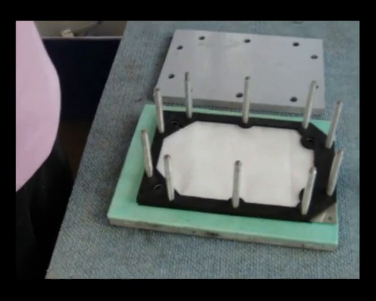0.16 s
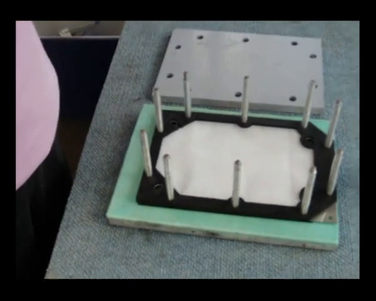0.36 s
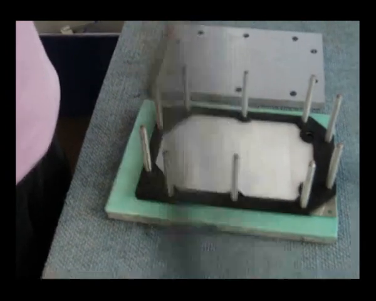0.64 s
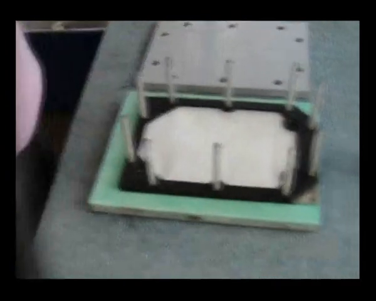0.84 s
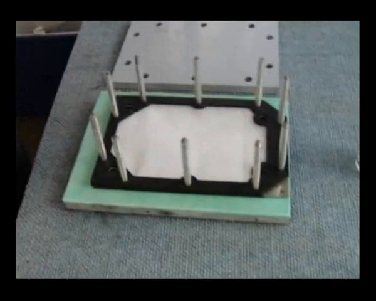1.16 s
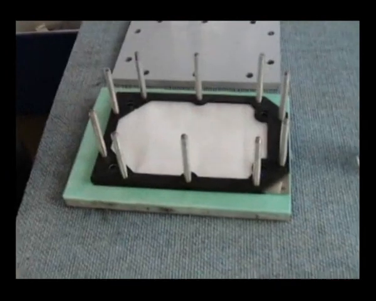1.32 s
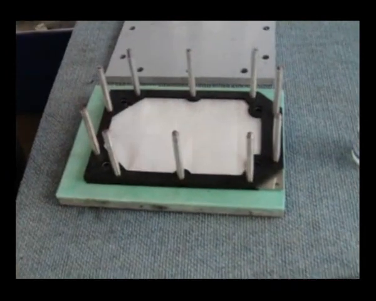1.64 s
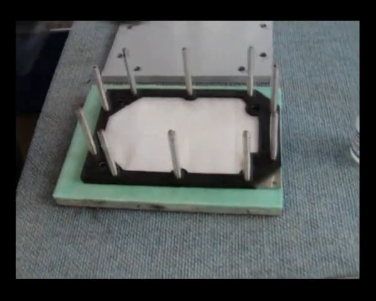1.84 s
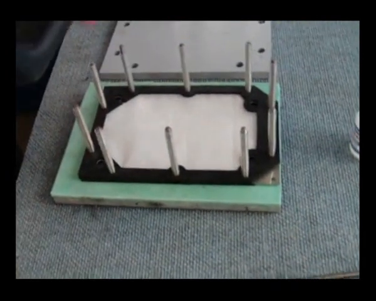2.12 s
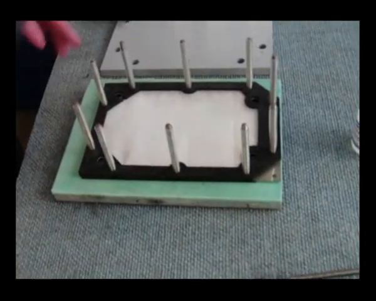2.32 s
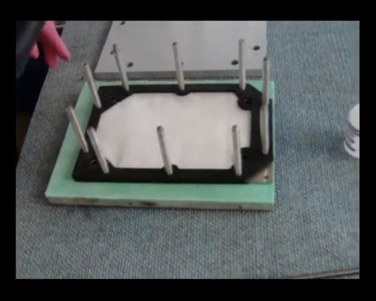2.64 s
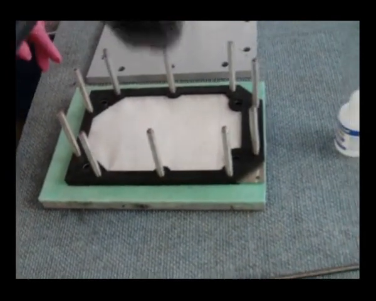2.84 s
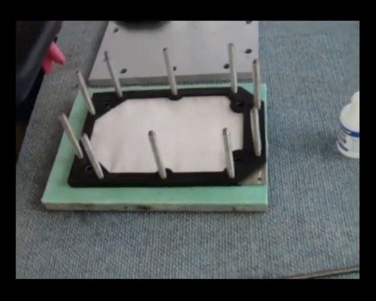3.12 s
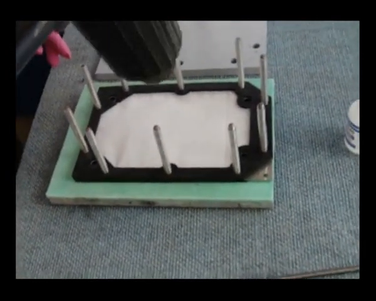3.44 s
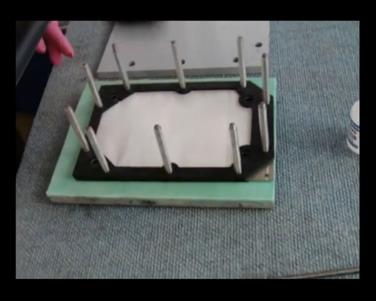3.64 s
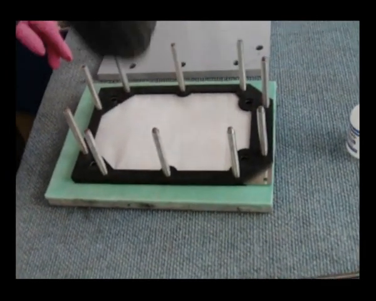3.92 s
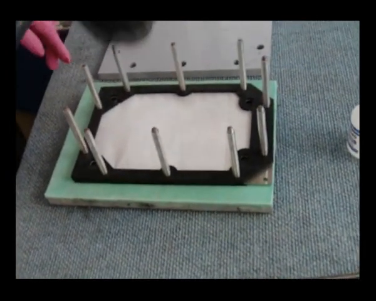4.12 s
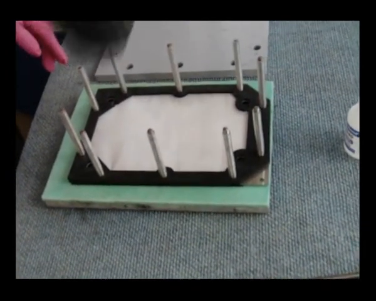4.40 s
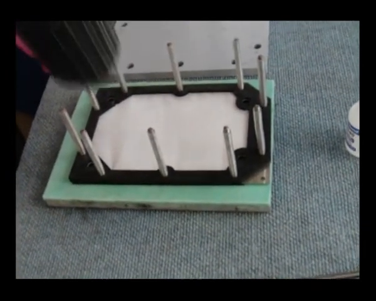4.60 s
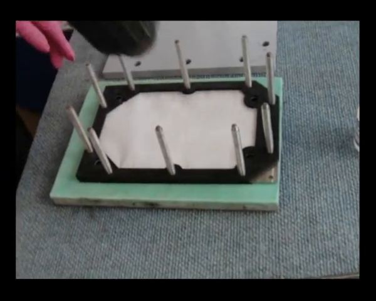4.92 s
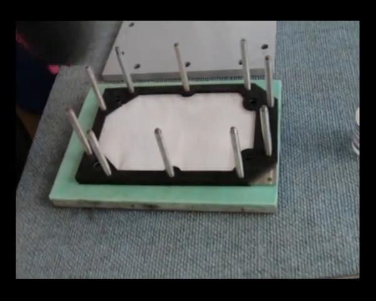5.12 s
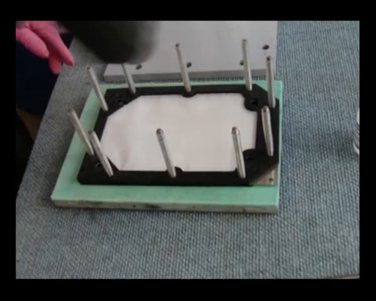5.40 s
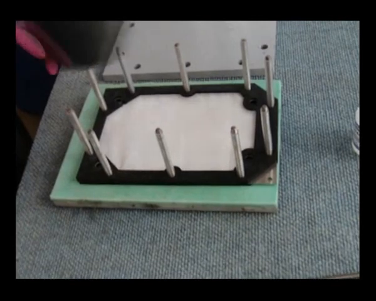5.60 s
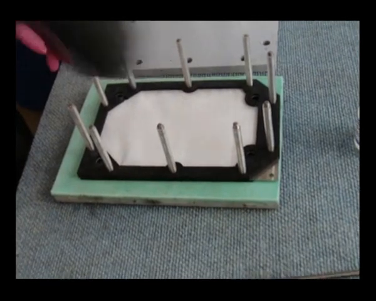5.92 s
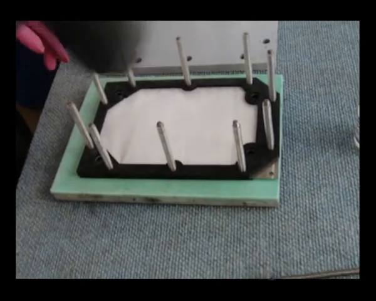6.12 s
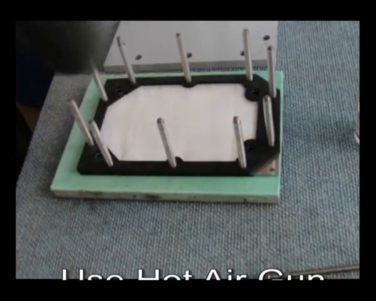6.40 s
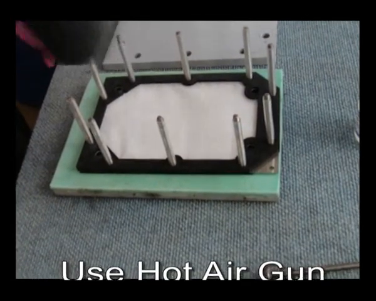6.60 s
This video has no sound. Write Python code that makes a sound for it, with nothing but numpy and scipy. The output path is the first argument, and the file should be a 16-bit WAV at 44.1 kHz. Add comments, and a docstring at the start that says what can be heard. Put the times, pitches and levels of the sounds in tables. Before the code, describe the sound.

A hot air gun spins up and runs steadily, a close rush of air with a wavering fan whine.

```python
"""A hot air gun spins up close to a mono microphone: the fan's hum and blade whine glide up in pitch
over a steady rush of air from the barrel, and mains ripple gives the whine a slight throb.
From half a second on, the nozzle moves in over a workpiece on a cloth-covered table; the rush brightens.
For the rest of the scene the gun is waved over the work: the pitch drifts a little,
and single tones at multiples of the shaft rate swell and fade as the reflections shift."""
import sys
import numpy as np
from scipy import signal
from scipy.fft import rfft, irfft
from scipy.io import wavfile

SR = 44100
rng = np.random.default_rng(int(sys.argv[2]) if len(sys.argv) > 2 else 0)


def generate_wav(signal):
    """Clip the signal to [-1, 1] and save it as 16-bit WAV at the path in sys.argv[1]."""
    frames = np.transpose(np.atleast_2d(signal))
    scaled = np.clip(frames, -1, 1) * 32767
    pcm = np.round(scaled).astype(np.int16)
    wavfile.write(sys.argv[1], SR, pcm)


N = 297675
T = np.arange(N) / SR
FREQS = np.arange(N // 2 + 1) * SR / N
START_HZ, RUNNING_HZ, SPIN_UP_S = 275.3, 349.5, 0.308
RIPPLE_HZ, TOP_HZ = 100, 11900
ORDER_PHASE = rng.uniform(0, 2 * np.pi, size=64)  # start phase of each multiple of the shaft rate

# pitch drift of the motor as the gun is waved: (time [s], shaft rate offset [Hz])
PITCH_DRIFT = [(.25, -1), (.6, 0), (1.15, 1), (1.5, -0.69), (2.72, 0.7), (2.95, 3.5), (3.52, 5.5),
               (3.78, 2.5), (4.35, 0.6), (4.6, 3), (4.95, 4.7), (5.1, 4), (5.38, 5), (5.6, 3.5), (6.5, 2)]
# the nozzle's move: (time [s], nearness [0 = held away, 1 = over the work])
NOZZLE_MOVE = [(.5, 0.046), (1.2, 0.33), (1.7, 0.66), (2.4, 1), (3.4, 0.8), (6.0, 1)]
# envelope of the hum's fundamental: (time [s], level [dB])
HUM_ENVELOPE = [(.2, -39), (.31, -32), (.41, -42.5), (.72, -33), (1.0, -32.5), (1.35, -30.5), (2.7, -28.5),
                (3.5, -30), (4.1, -28.5), (5.1, -30.5), (5.32, -33), (5.55, -30.5), (6.1, -29.5),
                (6.75, -29.5)]
# body of the hum: (shaft order, level held away [dB], level over the work [dB], speed exponent)
HUM_PARTIALS = [(4, -35.5, -37, -1), (5, -34.5, -45, -1.1), (6, -39, -35, 1)]
# whine of the blades: (shaft order, level held away [dB], level over the work [dB], speed exponent)
WHINE_PARTIALS = [(7, -30.5, -32.5, 11), (8, -21.5, -29.5, 3.2), (9, -32, -29, 13)]
# thin sheen of fan and motor tones: (shaft order, relative level [dB])
SHEEN_PARTIALS = [(2, -39.5), (3, -37.5), (10, -39), (11, -39), (13, -42), (14, -38.5), (15, -47.5),
                  (16, -47.5), (19, -45), (20, -45), (21, -48), (22, -47), (23, -45), (24, -44),
                  (25, -40.5), (26, -41.5), (27, -39.5), (28, -42), (29, -42), (30, -40), (31, -38),
                  (32, -44), (33, -45)]
# single tones that swell as the motor speeds up or the gun turns:
# (time [s], shaft order, half length [s], peak level [dB])
TONE_SWELLS = [(0, 5, .15, -28), (.05, 8, .08, -33), (.054, 39, .08, -32.5), (0.158, 15, .18, -31),
               (0.222, 36, .07, -31), (.23, 8, .1, -23), (.24, 35, .08, -30), (.25, 4, .25, -29.5),
               (0.325, 25, .07, -35), (.42, 33, .15, -41), (.42, 34, 0.13, -33), (0.453, 5, .1, -27.5),
               (.47, 29, .14, -41), (0.818, 8, 0.16, -22.5), (1.1, 7, 0.43, -24), (1.26, 27, 0.19, -29.5),
               (1.38, 5, .11, -28), (1.65, 5, 0.2, -33), (1.44, 31, .08, -29), (1.46, 7, 0.095, -24),
               (1.645, 8, 0.12, -19), (1.843, 7, 0.12, -26), (2.097, 8, 0.23, -22), (2.28, 27, .07, -34),
               (2.327, 8, 0.046, -22.5), (2.42, 9, .06, -28.5), (2.572, 8, 0.048, -21.5),
               (2.66, 9, 0.16, -23.5), (2.797, 8, 0.17, -23.5), (3.053, 8, 0.11, -21.5),
               (3.06, 6, .1, -28.5), (3.1, 30, .12, -41), (3.343, 9, .05, -24), (3.52, 7, 0.11, -30),
               (3.6, 8, 0.035, -27), (3.65, 6, .12, -30), (3.65, 2, 0.068, -29), (3.88, 9, 0.074, -22.5),
               (3.9, 30, .07, -30), (4.197, 2, .1, -33), (4.32, 9, 0.19, -23), (4.33, 8, .07, -26),
               (4.653, 8, .13, -26), (4.75, 6, 0.17, -28), (4.94, 8, 0.098, -19), (5.147, 2, 0.11, -31.5),
               (5.207, 4, 0.099, -30), (5.5, 8, 0.11, -18.5), (5.66, 4, .12, -29), (5.88, 30, .06, -31),
               (6.05, 8, 0.049, -19), (6.17, 2, 0.12, -31.5), (6.285, 8, 0.062, -24.5), (6.5, 5, 0.82, -31),
               (6.66, 8, 0.11, -21.5)]
# broad colour of the rushing air: (frequency [Hz], relative spectral level [dB])
AIR_COLOUR = [(20, -27.5), (85, -19), (300, -14), (470, -11.5), (720, -2), (1100, 1.5), (1450, -7.5),
              (2100, -3), (3300, -3), (3800, -8.5), (8800, -13), (10500, -10.5), (12000, -10.5)]
# peaks and notches of barrel and housing: (frequency [Hz], half width [Hz], gain [dB])
BARREL_EQ = [(40, 7.2, 5.5), (60, 10, -9), (80, 7, 4), (163, 13, 5.5), (205, 38, -1.5), (650, 19, 1.5),
             (690, 20, -0.5), (861, 9.1, 4.5), (1015, 24, 4), (1600, 45, 1.5), (1700, 50, -0.5),
             (2300, 63, 1.5), (2560, 78, 1.5), (4000, 44, 4.5), (4120, 130, -1), (4820, 180, 4.5),
             (5270, 170, -2.5), (5820, 150, 4.5), (6360, 200, 2), (8800, 120, -0.5), (9930, 110, 4),
             (10650, 120, 4)]


def undb(db):
    """Decibels to gain."""
    return 10 ** (np.asarray(db) / 20)


def envelope(table):
    """Straight ramps between (time, value) breakpoints."""
    return np.interp(T, *np.transpose(table))


def unit_rms(x):
    """Scale to rms 1."""
    return x / np.std(x)


def wobble(rate_hz):
    """Smooth random modulation, rms 1, rolling off above rate_hz."""
    noise = rfft(rng.standard_normal(N)) * (FREQS > 0)
    return unit_rms(irfft(noise / (1 + (FREQS / rate_hz) ** 4), N))


def shaft_hz():
    """The motor closes exponentially on its running speed and drifts slowly around it."""
    return RUNNING_HZ - (RUNNING_HZ - START_HZ) * np.exp(-T / SPIN_UP_S) + envelope(PITCH_DRIFT)


def shaft_angle(wander_hz=0.099):
    """The shaft turns with a slight unsteadiness."""
    return 2 * np.pi * np.cumsum(shaft_hz() + wander_hz * wobble(7.6)) / SR


def speed_db():
    """Shaft rate relative to the running speed, in dB."""
    return 20 * np.log10(shaft_hz() / RUNNING_HZ)


def level_ride_db(away_db, near_db, speed_exponent):
    """A level that shifts as the nozzle comes over the work and follows a power of motor speed."""
    return away_db + (near_db - away_db) * envelope(NOZZLE_MOVE) + speed_exponent * speed_db()


def partial(angle, order, scatter, fade_hz):
    """One multiple of the shaft rate, rms 1: the direct wave plus reflections that shift with the gun."""
    paths = 1 + scatter * (wobble(fade_hz) + 1j * wobble(fade_hz))
    wave = np.exp(1j * (order * angle + ORDER_PHASE[order]))
    return unit_rms(np.real(paths * wave))


def fan_hum(angle):
    """The fan hums cleanly at its shaft rate, with wavering mid partials for body."""
    fundamental = undb(envelope(HUM_ENVELOPE)) * partial(angle, order=1, scatter=0.056, fade_hz=10)
    body = sum(undb(level_ride_db(*ride)) * partial(angle, order, scatter=0.078 * order, fade_hz=7)
               for order, *ride in HUM_PARTIALS)
    return fundamental + body


def blade_whine(angle):
    """The blades add a rougher whine that grows steeply with motor speed."""
    return sum(undb(level_ride_db(*ride)) * partial(angle, order, scatter=0.27, fade_hz=13)
               for order, *ride in WHINE_PARTIALS)


def motor_sheen(angle, aim_db, beaming=0.7, speed_exponent=5):
    """Thin tones come up with speed and as the gun points this way; shorter waves fade in and out faster."""
    tones = 0
    for order, db in SHEEN_PARTIALS:
        tones += undb(db) * partial(angle, order, scatter=0.31 + 0.027 * order, fade_hz=4 + 0.067 * order)
    return undb(beaming * aim_db + speed_exponent * speed_db()) * tones


def partial_swells(angle):
    """Single partials swell and fade as the motor speeds up through the housing's resonances or as the gun
    turns; each swelling tone runs a quarter cycle behind its shaft order."""
    tones = 0
    for order in sorted({row[1] for row in TONE_SWELLS}):
        swell = sum(undb(db) * np.exp(-((T - peak_s) / half_s) ** 2)
                    for peak_s, swell_order, half_s, db in TONE_SWELLS if swell_order == order)
        lagging_angle = angle - np.pi / 2 / order
        tones += swell * partial(lagging_angle, order, scatter=0.04 + 0.008 * order, fade_hz=16)
    return tones


def mains_throb(depth=0.059):
    """The motor's torque pulses at twice the mains rate and shakes the blade tones."""
    return 1 + depth * np.sin(2 * np.pi * RIPPLE_HZ * T)


def air_rush(aim_db, flicker_db=0.36, beam_hz=1700):
    """Turbulent air coloured by the barrel; its treble is beamed along the nozzle and each band flickers."""
    log_f = np.log(FREQS + 1e-3)
    colour_hz, colour_db = np.transpose(AIR_COLOUR)
    eq_db = np.interp(log_f, np.log(colour_hz), colour_db)
    eq_db += sum(db * np.exp(-((FREQS - hz) / width) ** 2) for hz, width, db in BARREL_EQ)
    air = irfft(rfft(rng.standard_normal(N)) * undb(eq_db) * (FREQS < TOP_HZ), N)
    spectrum = rfft(unit_rms(air))
    centres_hz = 250 * 2 ** (np.arange(12) / 2)  # crossfaded half-octave bands
    rush = 0
    for hz, band_weights in zip(centres_hz, np.eye(len(centres_hz))):
        band = irfft(spectrum * np.interp(log_f, np.log(centres_hz), band_weights), N)
        beaming = hz ** 2 / (hz ** 2 + beam_hz ** 2)
        rush += band * undb(beaming * aim_db + flicker_db * wobble(16))
    return rush * undb(level_ride_db(away_db=-20, near_db=-20.5, speed_exponent=0))


def table_bounce(x, gain=0.13, lag_s=0.001394, sway=0.128):
    """The table top returns the rush a moment later; the lag sways with the hand, a faint flanging."""
    lag = lag_s * (1 + sway * wobble(1.35))
    return x + gain * np.interp(T - lag, T, x)


def room(x, wet_db=-14, t60_s=0.23):
    """Nearby walls add a short, dense tail that ripples the colour of the rush."""
    tail = rng.standard_normal(N) * np.exp(-np.log(1000) * T / t60_s)
    wet = irfft(rfft(x) * rfft(tail / np.linalg.norm(tail)), N)
    return x + undb(wet_db) * wet


def scene():
    """Fan tones over a bed of rushing air, the same in both channels."""
    # how directly the nozzle's hiss reaches the microphone
    aim_db = level_ride_db(away_db=-2, near_db=1.5, speed_exponent=2)
    angle = shaft_angle()
    hum = fan_hum(angle)
    blade_tones = blade_whine(angle) + motor_sheen(angle, aim_db) + partial_swells(angle)
    air = room(table_bounce(air_rush(aim_db)))
    gun = hum + blade_tones * mains_throb() + air
    return np.array([gun, gun])


def record(dry):
    """A steep low-pass takes off the top end."""
    return signal.sosfilt(signal.ellip(12, 0.1, 90, TOP_HZ, fs=SR, output="sos"), dry)


dry = scene()
out = record(dry)
generate_wav(out)
```